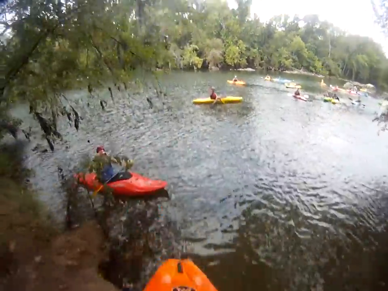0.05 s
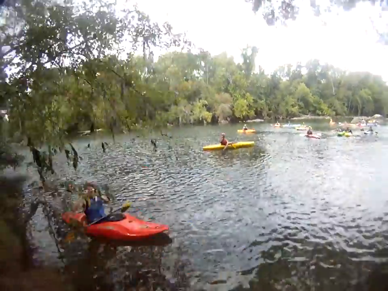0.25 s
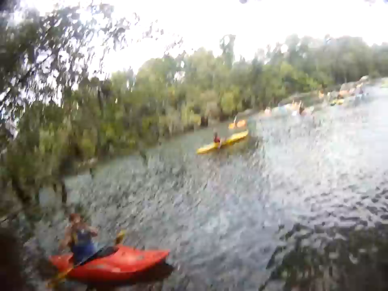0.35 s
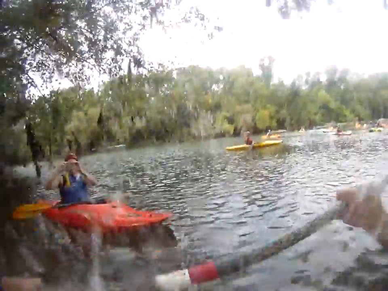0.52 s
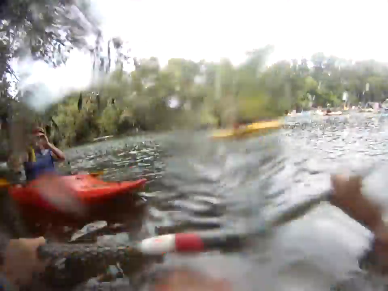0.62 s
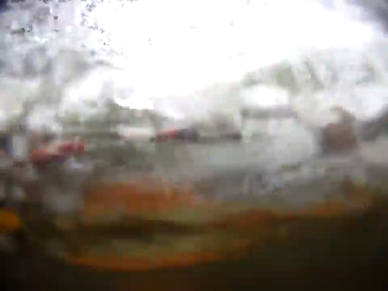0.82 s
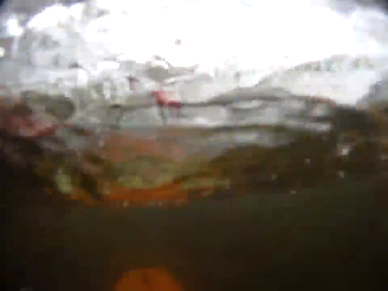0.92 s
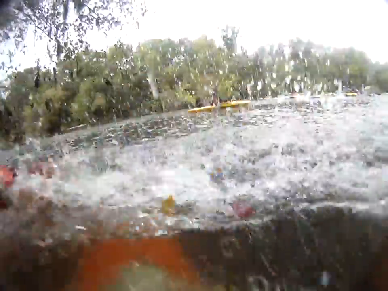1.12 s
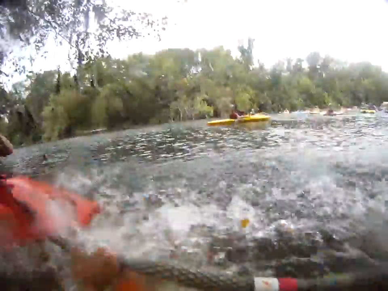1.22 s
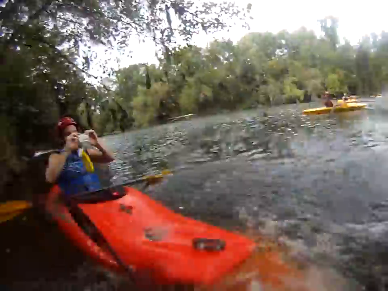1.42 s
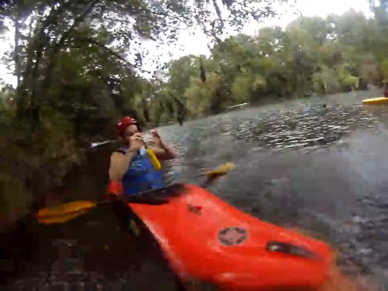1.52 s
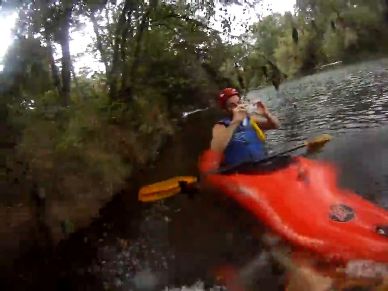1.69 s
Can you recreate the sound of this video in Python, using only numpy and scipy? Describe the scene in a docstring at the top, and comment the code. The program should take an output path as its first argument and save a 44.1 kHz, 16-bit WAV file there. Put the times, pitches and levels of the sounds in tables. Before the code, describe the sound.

A plastic kayak slides down a dirt bank with gritty scrapes and hollow knocks, then plunges into a river. Water gushes and slaps right against the microphone, leaving fizzing foam over a low rumble of air.

```python
"""Over a low buffeting of air, grit scrapes and stones click under a plastic kayak as it bumps down a
dirt bank, its hollow hull booming at each knock, and plunges into a river. Water gushes over the bow
and slaps the case of the paddler's camera, ringing with trapped air; then foam fizzes on.
The camera overloads on the hardest hits and holds each sample of a low rate, adding a glassy treble."""
import sys
import numpy as np
from scipy import signal
from scipy.fft import rfft, irfft, next_fast_len
from scipy.io import wavfile

SR = 44100
rng = np.random.default_rng(int(sys.argv[2]) if len(sys.argv) > 2 else 0)


def wav_out(sig):
    """Save sig, one row per channel (or a flat mono array), as 16-bit PCM at SR to the path in sys.argv[1]."""
    wavfile.write(sys.argv[1], SR, np.round(np.clip(np.atleast_2d(sig).T, -1, 1) * 32767).astype(np.int16))


N = 77175
T = np.arange(N) / SR

# tone of crunching dirt (frequency [Hz], level [dB])
GRIT_SPECTRUM = [(150, 2.5), (450, -18), (900, -12), (2500, -6.5), (3200, -15.5), (4500, -22.5),
                 (6000, -23.5)]
# tone of water spray (frequency [Hz], level [dB])
SPRAY_SPECTRUM = [(100, -4.5), (300, -19), (600, -11), (1100, -17.5), (2000, 6), (3300, 2.5), (4500, -8.5),
                  (6000, -6)]
GRIT_RISE_S, CRACK_T60_S = 0.00068, 0.011


def amp(db):
    """Decibels to gain."""
    return 10 ** (np.asarray(db) / 20)


def unit(x):
    """Scale to rms 1."""
    return x / np.sqrt(np.mean(x ** 2) + 1e-20)


def filtered(x, response):
    """Shape x with a gain given as a function of frequency."""
    size = next_fast_len(N + 8192)
    return irfft(rfft(x, size) * response(np.fft.rfftfreq(size, 1 / SR)), size)[:N]


def noise(spectrum):
    """Noise of rms 1, coloured by (frequency [Hz], level [dB]) points."""
    points_hz, db = np.transpose(spectrum)
    white = rng.standard_normal(N)
    return unit(filtered(white, lambda hz: amp(np.interp(np.log(hz + 1), np.log(points_hz + 1), db))))


def envelope(start, rise, hold, t60):
    """Attack, hold and exponential release, all in seconds."""
    t = np.maximum(T - start, 0)
    return (1 - np.exp(-t / rise)) * amp(-60 * np.maximum(t - hold, 0) / t60)


def clumps(depth_db, per_s=500):
    """A fast random gain of rms 1: grains arrive in bunches."""
    knots = rng.standard_normal(4096)
    return unit(amp(depth_db * np.interp(T * per_s, np.arange(len(knots)), knots)))


def rumble():
    """Air and water buffet the moving case, and surges of water shake the hull."""
    # fader curve of the buffeting (time [s], level [dB])
    buffet_curve = [(0, -28), (.15, -41), (.25, -23), (.47, -22), (.66, -27.5), (.79, -20.5), (.89, -40),
                    (1.1, -27), (1.33, -21.5), (1.45, -28.5), (1.58, -30.5), (1.65, -39), (1.75, -43)]
    # its sub-bass tone (frequency [Hz], level [dB])
    buffet_spectrum = [(10, -1), (24, 4.5), (34, 6.5), (48, 1), (90, -15), (200, -47), (500, -65)]
    # surges against the hull (peak time [s], width [s], level [dB])
    surges = [(.745, 0.15, -35), (0.79, 0.0079, -15), (.96, 0.028, -34), (1.036, 0.017, -21),
              (1.15, 0.051, -34), (1.74, 0.019, -34.5)]
    # their hollow tone (frequency [Hz], level [dB])
    surge_spectrum = [(20, -6.5), (60, -3), (100, 5), (160, -17.5), (255, -6.5), (400, -26), (900, -12),
                      (2000, -51)]
    buffet = amp(np.interp(T, *np.transpose(buffet_curve))) * noise(buffet_spectrum)
    swell = sum(amp(db) * np.exp(-.5 * ((T - peak) / width) ** 2) for peak, width, db in surges)
    return buffet + swell * noise(surge_spectrum)


def river():
    """A faint, steady bed of open air by the river."""
    # tone of the ambience (frequency [Hz], level [dB])
    spectrum = [(60, -6), (120, -6), (250, -20), (500, -22), (900, -21), (2300, -19), (4000, -28),
                (5800, -33)]
    return amp(-52) * noise(spectrum)


def wall_ring(hz, width_octaves=0.57):
    """Ring of the plastic wall; a contact excites mostly the modes near one pitch."""
    # modes of the wall (frequency [Hz], level [dB], t60 [s])
    modes = [(860, 3, 0.032), (1623, -1, 0.018), (1697, 0.5, 0.014), (1960, -0.5, 0.017), (2450, -4, 0.015),
             (3490, 3, 0.016), (4600, -3.5, 0.012)]
    mode_hz, db, t60 = np.transpose(modes)[:, :, None]
    weight = amp(db) * np.exp(-.5 * (np.log2(mode_hz / hz) / width_octaves) ** 2)
    t = T[:SR // 10]
    rings = weight * amp(-60 * t / t60) * np.sin(2 * np.pi * mode_hz * t)
    return rings.sum(axis=0) / weight.sum()


def dirt():
    """Grit scrapes along the hull and rings its plastic wall."""
    # drags over the bank (start [s], length [s], level [dB])
    scrapes = [(0.186, .02, -44.5), (.204, 0.16, -46), (0.308, 0.0093, -29), (0.415, 0.093, -47),
               (0.539, 0.048, -37.5)]
    pressure = sum(amp(db) * envelope(start, GRIT_RISE_S, length, t60=0.014)
                   for start, length, db in scrapes)
    grit = unit(noise(GRIT_SPECTRUM) * clumps(depth_db=1.5))
    hollow = unit(signal.fftconvolve(grit, wall_ring(hz=2530))[:N])
    return pressure * unit(grit + amp(-10.5) * hollow)


def stones():
    """Each stone gives a hollow click of the wall and a small crunch."""
    # stone hits (time [s], level [dB], pitch excited most [Hz])
    clicks = [(.19, -31, 4370), (.3415, -5.5, 1440), (.347, 4.5, 1820), (.421, -21.5, 1250),
              (.4838, -13, 1770), (.496, -23.5, 4020), (.4975, -23.5, 905), (.5735, -18, 1310),
              (.5755, -23, 3500)]
    crunch_slope = 1.38  # dB of crunch per dB of click: light contacts only click
    out, grit = np.zeros(N), amp(-4) * noise(GRIT_SPECTRUM)
    for start, db, hz in clicks:
        ring = wall_ring(hz)
        out[round(start * SR):][:len(ring)] += amp(db) * ring
        out += amp(crunch_slope * db) * envelope(start, GRIT_RISE_S, 0, CRACK_T60_S) * grit
    return out


def hull():
    """Each bump pushes the hollow hull with a short smooth force; longer contact gives a deeper boom."""
    # knocks on the bank and, last, on the water (time [s], level [dB], contact length [s])
    knocks = [(.229, -1.5, 0.0065), (0.3407, 9, 0.0041), (0.3469, 11.5, 0.0038), (0.42, -7, .0065),
              (0.431, -12, 0.0065), (0.482, 3.5, 0.0074), (0.496, 4, 0.0081), (0.5738, -3, .0055),
              (0.5788, 3, 0.0084), (0.784, 1.5, 0.011)]
    # boom of the hull (frequency [Hz], level [dB], t60 [s])
    modes = [(94.8, -4, 0.094), (129, -13, 0.019), (176, -25.5, 0.031), (209, -9.5, 0.028)]
    force = np.zeros(N)
    for start, db, contact in knocks:
        push = np.sin(np.pi * np.clip((T - start) / contact, 0, 1)) ** 2
        force += amp(db) * push / push.sum()
    ring = sum(amp(db - 60 * T / t60) * np.cos(2 * np.pi * hz * T) for hz, db, t60 in modes)
    return -signal.fftconvolve(force, ring)[:N]


def bubbles(hz, per_s, start, length):
    """A cloud of short, slightly rising bubble rings scattered around hz, rms 1 over its length."""
    log_pitch_spread, size_spread_db, t60_cycles, chirp = 0.405, 3, 25, 0.037
    count = int(per_s * length) + 1
    draws = np.random.default_rng(rng.integers(2 ** 31)).uniform(1e-4, 1 - 1e-4, (count, 4))
    radius, angle, size, onset = draws.T[:, :, None]
    gaussian = np.sqrt(-2 * np.log(radius)) * np.cos(2 * np.pi * angle)
    pitch = hz * np.exp(log_pitch_spread * gaussian)
    samples = np.arange(SR // 50)
    cycles = pitch * samples / SR
    age = cycles / t60_cycles
    level = amp(-size_spread_db * np.log(size) - 60 * age) * (1 - np.exp(-2 * cycles))
    rings = level * np.sin(2 * np.pi * cycles * (1 + chirp * age))
    positions = ((start + length * onset) * SR).astype(int) + samples
    cloud = np.bincount(positions.ravel(), rings.ravel(), N)
    return cloud[:N] / np.sqrt(np.sum(cloud ** 2) / (length * SR))


def foam():
    """Churned water and falling droplets fizz around the boat."""
    # fader curve of the fizz (time [s], level [dB])
    fizz_curve = [(.6, -52), (.8, -43), (1.12, -34), (1.22, -31), (1.5, -34), (1.75, -35.5)]
    # its tone (frequency [Hz], level [dB])
    spectrum = [(88, -49), (150, -17), (248, -12.5), (651, -13), (819, -6.5), (954, -16.5), (1380, -2.5),
                (1990, 1), (5210, -19.5), (5800, -15.5), (7540, -87)]
    level = amp(np.interp(T, *np.transpose(fizz_curve), left=-np.inf))
    return level * (noise(spectrum) + amp(-11) * bubbles(hz=2200, per_s=900, start=0, length=N / SR))


def gushes():
    """Sheets of water break into dense small bubbles and spray."""
    # sheets over the bow (start [s], length [s], level [dB], bubble pitch [Hz])
    sheets = [(0.628, .016, -25, 2940), (0.65, 0.033, -9, 2524), (0.694, 0.011, -16, 2060),
              (0.716, 0.04, -32.5, 2090), (0.753, 0.043, -24, 1906), (0.791, 0.041, -10.5, 1960),
              (0.844, 0.035, -24.5, 2500), (0.918, .04, -34.5, 2670), (0.977, 0.095, -30.5, 1720),
              (1.056, .032, -19.5, 2250), (1.131, 0.073, -27, 1890)]
    rise_s, t60_s, bubble_low_cut_hz = 0.0005, 0.04, 1040
    spray = amp(-2.5) * noise(SPRAY_SPECTRUM) * clumps(depth_db=5)
    flow, ringing = np.zeros(N), np.zeros(N)
    for start, length, db, hz in sheets:
        gush = amp(db) * envelope(start, rise_s, length, t60_s) / np.sqrt(2)
        flow += gush
        ringing += gush * bubbles(hz, per_s=4500, start=start, length=length + t60_s)
    ringing = filtered(ringing, lambda hz: 1 / np.sqrt(1 + (bubble_low_cut_hz / (hz + 1)) ** 10))
    return flow * spray + ringing


def slaps():
    """A lump of water cracks on the case and its trapped air rings briefly, sagging in pitch."""
    # one air pocket per slap (time [s], level [dB], starting pitch [Hz], t60 [s])
    pockets = [(.6475, -3, 2024, 0.023), (.6575, 3, 2540, 0.0052), (0.659, -11, 1175, 0.061),
               (0.6732, 9.5, 2006, 0.011), (.787, -15, 845, 0.16), (.7952, 8.5, 1948, 0.024),
               (.818, 5, 1824, .022), (0.868, -5.5, 2593, 0.018), (0.935, -23, 3730, 0.022),
               (0.941, -17.5, 2410, .025), (.955, -29, 3160, .02), (.979, -14.5, 1283, 0.03),
               (.9975, -13, 1980, 0.023), (1.035, 5.5, 4140, 0.011), (1.036, 8, 3190, 0.014),
               (1.04, -2, 1720, 0.029), (1.054, -2.5, 3400, 0.015), (1.0733, 7.5, 2570, 0.013),
               (1.076, 0.5, 3650, 0.024), (1.074, -9, 1141, 0.058), (1.089, -16.5, 960, 0.046),
               (1.0906, -10, 3600, 0.0053), (1.1345, -13.5, 2200, 0.028), (1.167, -11.5, 1800, 0.027),
               (1.1737, 1.5, 2960, 0.013), (1.184, -14, 1317, 0.052), (1.187, -18.5, 771, 0.088),
               (1.192, -0.5, 1923, 0.012), (1.408, -21, 836, 0.024)]
    rise_s, sag = 0.00082, 0.077
    out, spray = np.zeros(N), noise(SPRAY_SPECTRUM)
    for start, db, hz, t60 in pockets:
        t = np.maximum(T - start, 0)
        ring = envelope(start, rise_s, 0, t60) * np.sin(2 * np.pi * hz * t * (1 - sag * t / t60))
        crack = amp(-3.5) * envelope(start, rise_s, 0, CRACK_T60_S) * spray
        out += amp(db) * (ring + crack)
    return out


def limiter(x, threshold=0.92, attack_s=0.0034, release_db_per_s=113):
    """An overload pulls the gain down within milliseconds, then it creeps back."""
    over_db = 20 * np.log10(np.maximum(np.abs(x) / threshold, 1))
    recovery_db = release_db_per_s * T
    cut_db = np.maximum.accumulate(over_db + recovery_db) - recovery_db
    pole = np.exp(-1 / (attack_s * SR))
    return x * amp(-signal.lfilter([1 - pole], [1, -pole], cut_db))


def scene():
    """Bank, plunge and foam, heard in mono from the boat."""
    return (hull() + dirt() + stones() + gushes() + slaps() + foam() + rumble() + river())[None]


def record(dry):
    """The camera narrows the band, limits, soft-clips and holds samples, mirroring sound into treble."""
    low_cut_hz, high_cut_hz = 25.3, 5510
    hold_rate_hz, repeats, top_hz = 12000, 4, 15600

    def mic_band(hz):
        """A gentle low cut and a steep high cut."""
        return 1j * hz / (low_cut_hz + 1j * hz) / np.sqrt(1 + (hz / high_cut_hz) ** 20)

    limited = limiter(filtered(dry[0], mic_band))
    clipped = limited / (1 + np.abs(limited) ** 6) ** (1 / 6)
    held = np.repeat(signal.resample_poly(clipped, hold_rate_hz, SR), repeats)
    glassy = signal.resample_poly(held, SR, repeats * hold_rate_hz)[:N]
    return filtered(glassy, lambda hz: hz < top_hz)[None]


dry = scene()
out = record(dry)
wav_out(out)
```